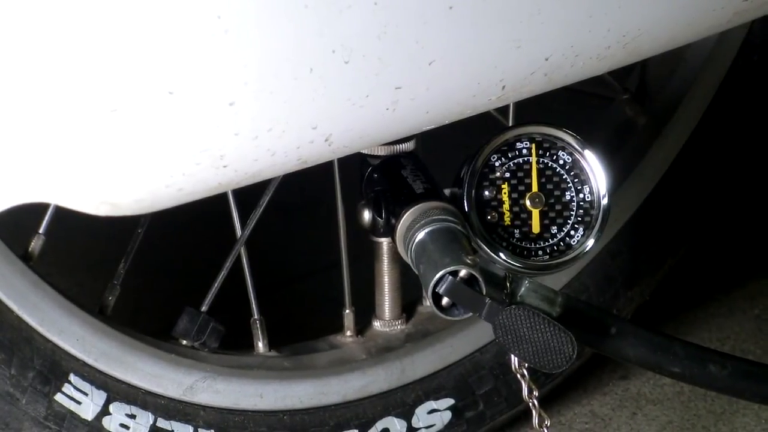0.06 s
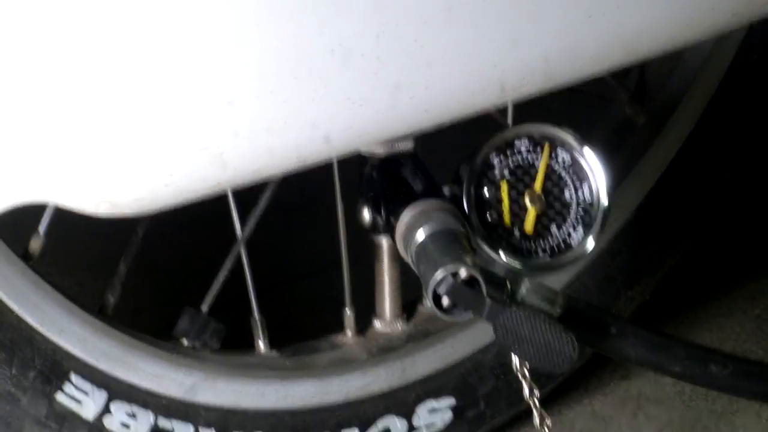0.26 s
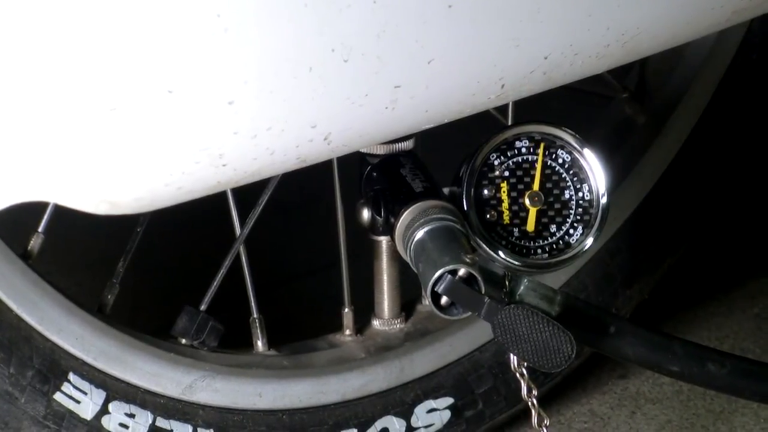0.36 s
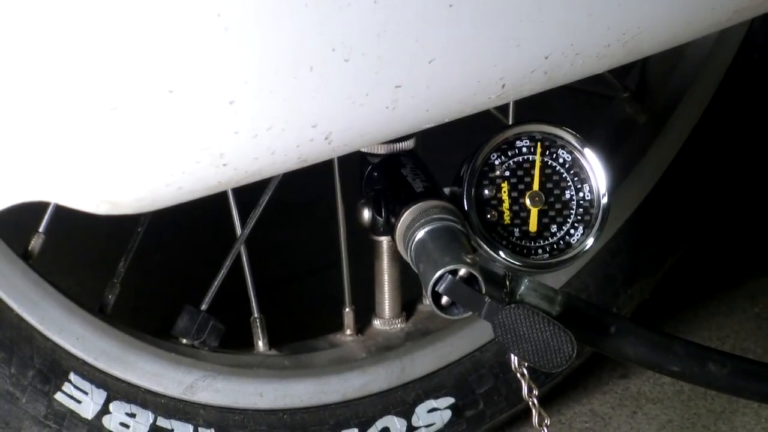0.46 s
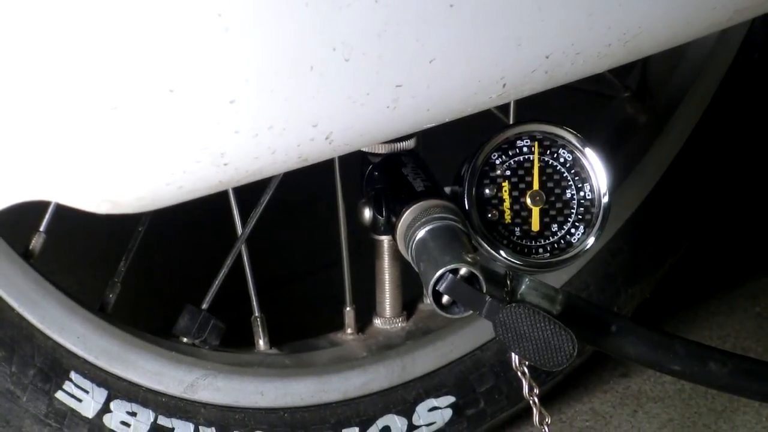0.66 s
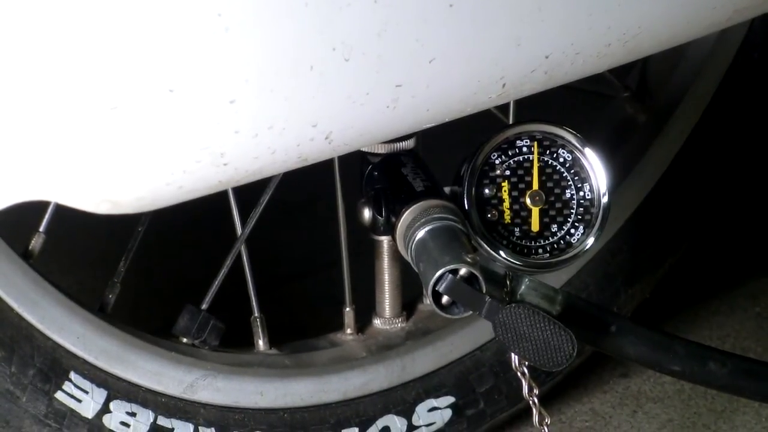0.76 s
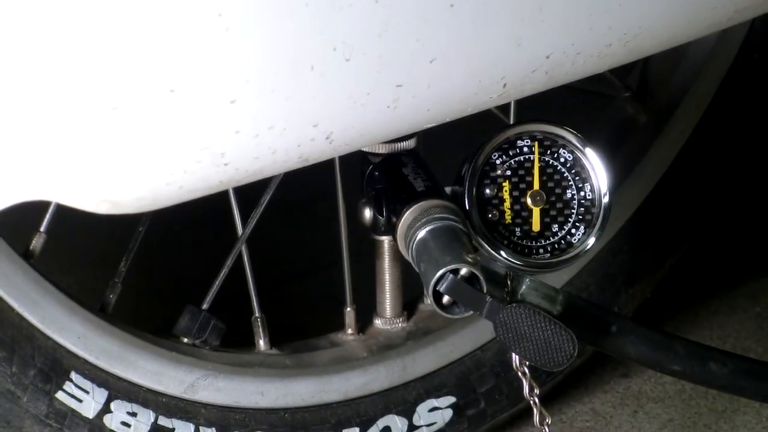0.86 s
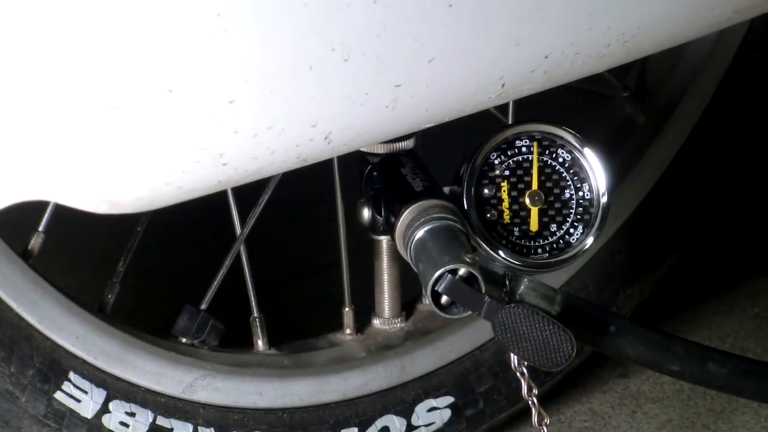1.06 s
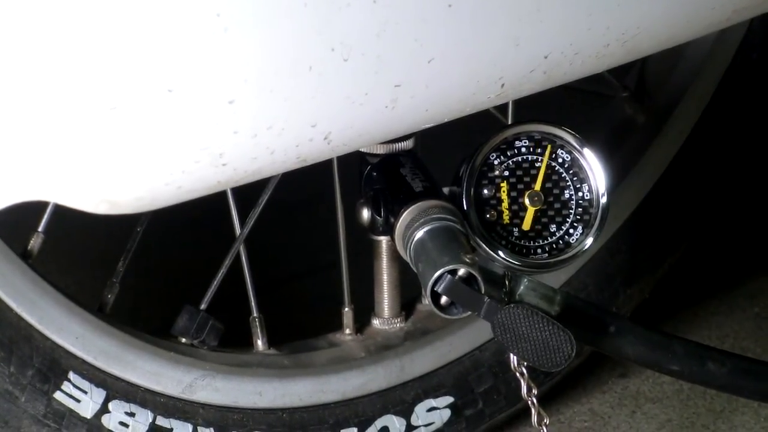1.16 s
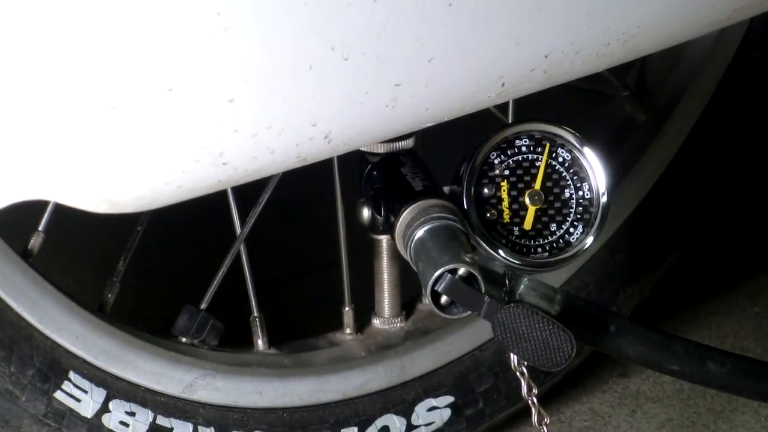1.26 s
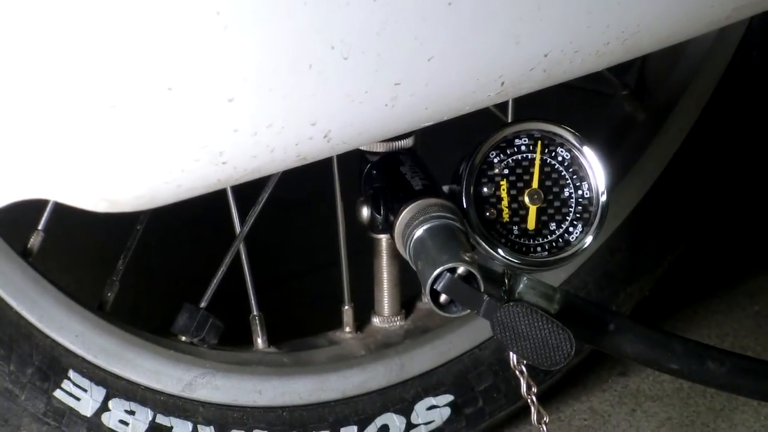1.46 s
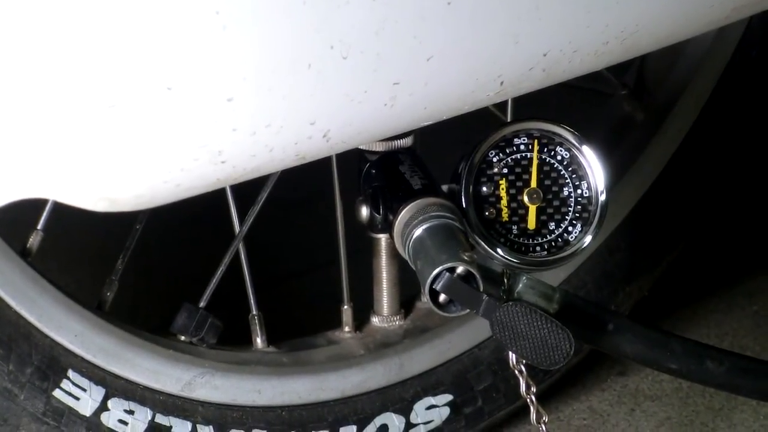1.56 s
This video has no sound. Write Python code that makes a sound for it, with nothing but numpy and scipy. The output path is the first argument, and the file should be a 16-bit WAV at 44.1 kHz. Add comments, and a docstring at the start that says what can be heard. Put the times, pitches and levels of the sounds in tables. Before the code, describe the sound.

A bicycle floor pump, heard close in a hard, echoing room with quiet room tone. Gritty, whistling air hisses from the start, with small ticks; at 0.24 s a loud piston thump booms and hums on, with a softer knock at 0.3. Thin valve whistles fade. Faint clicks and puffs come at 0.42 and 0.92. From 1.04 to 1.3, metal clicks, air and soft thumps crowd together; a sharp click snaps at 1.37.

```python
"""A floor pump fills a bicycle tyre in a hard, echoing room, heard close up over quiet room tone.
A burst of air is already hissing at the start: gritty noise plus whistling jet resonances.
Near 0.24 s the piston thumps at the end of its stroke: body modes ring, low room modes swell and hum,
and thin drifting whistles follow. More bursts come at 0.4 and 0.9 s; from 1.04 s metal clicks (noise
cracks and short modes), softer thumps and air crowd together, up to a sharp click near 1.37 s."""
import sys
import numpy as np
from scipy import signal
from scipy.fft import rfft, irfft
from scipy.io import wavfile
from scipy.ndimage import uniform_filter1d

SR = 44100
rng = np.random.default_rng(int(sys.argv[2]) if len(sys.argv) > 2 else 0)


def magnitude_from_level(level_db):
    """Linear magnitude for a level in decibels (20 dB per decade)."""
    exponent = np.asarray(level_db, float) / 20
    return 10 ** exponent


def pcm_store(signal):
    """Save signal as 16-bit PCM."""
    levels = np.round(np.clip(np.atleast_2d(signal), -1, 1) * 32767)
    wavfile.write(sys.argv[1], SR, levels.astype(np.int16).T)


N = 70560  # samples, 1.6 s

# spectrum of the room tone: pitch_hz, level_db (per Hz, relative)
ROOM_TONE = [(15, -26), (25, -6), (87, 2), (175, -9.5), (335, -8), (1260, -29.5), (1650, -25),
             (2480, -28.5), (7310, -29), (14400, -30.5), (16000, -47)]
ROOM_TONE_DB = -49
# decay of the room's tail: pitch_hz, t60_s
ROOM_DECAY = [(60, 0.56), (160, 0.75), (420, 0.76), (1100, 0.48), (2900, 0.55), (7700, 0.19), (14000, 0.14)]
ROOM_DB = -9
# stereo width of diffuse sound: pitch_hz, side_minus_mid_db
WIDTH = [(60, -11), (110, -11.5), (380, -16), (700, -10), (2380, -11), (4400, -8), (8120, 0), (15000, 0.5)]
# tilt of the direct sound between the two ports: pitch_hz, left_minus_right_db
PORT_TILT = [(60, -1), (380, -2), (2380, -1), (15000, 3.5)]
PORT_LAG_S = -0.000021
# low modes of the room, which build up after a knock: pitch_hz, level_db, t60_s
ROOM_MODES = [(47.3, -12, 0.86), (82.3, -11.5, 1.255), (121, -30, 0.77), (236.7, -27, 1.12),
              (294.9, -20, 0.78), (367.4, -36, 2.9), (494.5, -28, 1.25)]
HUM_RISE_S = 0.0276  # time constant of the build-up
# big knock shaking the microphone, opposite in its two ports: start_s, length_s, pitch_hz, level_db
MIC_SHAKE = (.2492, .1, 77, -25)
# metal clicks: start_s, level_db, strongest_near_hz, spread_octaves, ring_db (relative to level_db)
CLICK_EVENTS = [(.113, -41.5, 1750, 0.26, -7), (0.1194, -29, 6540, 0.13, -34),
                (0.2096, -27, 5150, 0.3, -45), (0.2417, -32.5, 2660, 0.95, -18.5),
                (0.4175, -34, 3300, 0.67, -17), (0.9192, -41, 5100, 1.2, -27),
                (1.044, -33, 3000, 1.12, -48), (1.0770, -29, 6660, 0.78, -40),
                (1.09, -23.5, 7340, 0.21, -40), (1.0916, -23, 3300, 0.97, -22),
                (1.1498, -22, 5000, 1.1, -33), (1.172, -33, 1740, 0.97, -37), (1.207, -32, 7950, 0.2, -36),
                (1.256, -36, 7760, 0.31, -33), (1.277, -39, 7800, 0.22, -41),
                (1.3653, -19.5, 3900, 1.84, -23.5)]
# short modes of the struck parts, before a small random detune: pitch_hz, level_db, t60_s
METAL_MODES = [(907, 12, 0.069), (1750, 0, 0.06), (2767, -4, 0.04), (3300, 1.5, 0.043), (4813, 8, 0.018),
               (5510, -5, 0.027), (7150, -0.5, 0.017), (8750, -3, 0.01), (11500, -2, 0.06)]
# long rings of barrel and spokes: pitch_hz, level_db, t60_s
LONG_RINGS = [(1523, -7, .7), (3040, -6, .5), (4606, -1, .33), (4636, -3, .3)]
CRACK_T60_S, CRACK_TOP_HZ = 0.014, 11500
DRY_SPREAD_OCTAVES = 0.55  # blows wider than this snap more than they ring
# piston and foot of the pump knocking:
# start_s, level_db, strongest_near_hz, spread_octaves, room_hum_db (relative to level_db), rise_s
THUMP_EVENTS = [(.2420, -12, 302, 2.12, 2, 0.00099), (.295, -15.5, 83, 1.47, -8.5, 0.0036),
                (1.152, -21, 123, 0.39, -28.5, 0.012), (1.151, -21.5, 419, 0.31, -10, 0.0069),
                (1.233, -19, 167.4, 0.38, -16.5, 0.0033), (1.258, -17.5, 91.5, 0.41, -19.5, 0.0061),
                (1.285, -25, 63, .4, -11.5, 0.011), (1.372, -28.5, 104, 1.25, -21, 0.008),
                (1.397, -35, 405, 0.44, -34, 0.002), (1.390, -22, 820, 0.18, -26, 0.0021)]
# modes of pump body and floor: pitch_hz, level_db, t60_s
BODY_MODES = [(62.5, -6.5, .12), (91, -7, 0.074), (127.7, -2.5, 0.092), (158, -10, 0.098),
              (220, -3.5, 0.053), (351.4, -1.5, 0.052), (391.6, -3, 0.048), (489, -11, 0.086),
              (640, -15.5, 0.074), (822, -12.5, 0.047), (1011, -18, 0.21), (1790, -4, 0.049)]
# thin whistles in the valve: start_s, length_s, first_hz, last_hz, level_db
VALVE_WHISTLES = [(.262, .085, 11700, 11650, -49), (.27, .2, 9400, 9000, -58), (.47, .3, 8950, 8400, -63),
                  (.52, .24, 10900, 11300, -65), (1.17, .23, 9700, 8950, -59)]
WHISTLE_WIDTH_HZ = 450
# resonances of the air jet: pitch_hz, width_hz, level_db (relative)
JET_RESONANCES = [(6070, 2100, -16), (7070, 550, -13.5), (8200, 1000, -15)]
# onset of each air burst: start_s
BURST_ONSETS = [-.05, .108, .208, .242, .417, .917, 1.07, 1.15, 1.366]
# shape of each burst: rise_s, hold_s, level_db, t60_s, jet_db, brightness_db (both relative to level_db)
BURST_SHAPES = [(0.012, 0.028, -44.5, 0.8, 11, -4), (0.0057, 0.033, -45.5, 0.38, 15, -0.5),
                (0.0019, 0.0085, -37.5, 0.34, -9, -1.5), (0.0045, 0.015, -38, 0.24, 5.5, -4),
                (0.002, 0.017, -44, 0.53, -16, -7), (0.0062, 0.015, -50, 1, 11.5, -5),
                (0.02, 0.019, -40, 0.48, 10.5, 0), (0.0049, 0.037, -49.5, 0.62, 14.5, 2.5),
                (0.0025, 0.021, -43.5, 0.46, -27, -2.5)]
# spectrum of the hiss: pitch_hz, level_db (per Hz, relative)
HISS_SPECTRUM = [(350, -8), (600, -2.5), (834, -2.5), (1510, -10), (2990, -6.5), (4710, -7.5),
                 (12000, -4.5), (16000, -13)]
GRIT_DB = 2.6  # rms of the fast level flutter
AIR_SPLIT_HZ = 5000  # between dull and bright hiss
AIR_WIDE_DB = -2


def read(points, hz):
    """Reads a table value on a log-frequency axis."""
    table_hz, value = np.transpose(points)
    return np.interp(np.log(hz + 1), np.log(table_hz + 1), value)


def evened(x):
    """Scales a sound to rms 1."""
    return x / np.sqrt(np.mean(x ** 2) + 1e-20)


def add(mix, start_s, sound):
    """Drops a sound into the mix at a given time."""
    part = mix[round(start_s * SR):][:len(sound)]
    part += sound[:len(part)]


def colour(x, points):
    """Filters a sound by a spectrum table."""
    n = x.shape[-1]
    gain = magnitude_from_level(read(points, np.fft.rfftfreq(n, 1 / SR)))
    return irfft(rfft(x) * gain, n)


def band_noise(hz, width_hz):
    """Noise through one resonance, at rms 1."""
    f = np.fft.rfftfreq(N, 1 / SR)
    resonance = 1 / (1 + (2 * (f - hz) / width_hz) ** 2)
    return evened(irfft(rfft(rng.standard_normal(N)) * resonance, N))


def modes(table, t, phase=0):
    """Sum of exponentially dying sines, as a struck object rings."""
    hz, db, t60 = np.transpose(table)[:, :, None]
    return (magnitude_from_level(db - 60 * t / t60) * np.sin(2 * np.pi * hz * t + phase)).sum(0)


def near(hz, centre_hz, spread):
    """Level change in dB away from where a blow is strongest."""
    return -12 * (np.log2(hz / centre_hz) / spread) ** 2


def struck(table, centre_hz, spread):
    """Weights modes by how strongly a blow excites each one."""
    return [(hz, db + near(hz, centre_hz, spread), t60) for hz, db, t60 in table]


def diffuse(mid, side):
    """Left and right from unrelated mid and side sound."""
    side = colour(side, WIDTH)
    return np.array([mid + side, mid - side])


def room_tone():
    """Steady quiet noise shaped by a spectrum and spread in stereo."""
    mid, side = colour(rng.standard_normal((2, N)), ROOM_TONE)
    return magnitude_from_level(ROOM_TONE_DB) * evened(diffuse(mid, side))


def room(x):
    """Dense echo tail: noise in which each band dies at its own speed."""
    hz, t, z = signal.stft(rng.standard_normal((2, SR)), SR, nperseg=512)
    decay = magnitude_from_level(-60 * t / read(ROOM_DECAY, hz)[:, None])
    tail = signal.istft(z * decay, SR, nperseg=512)[1]
    # silent for 3.3 ms, then fades in over 11 ms
    tail = tail * np.clip(np.arange(tail.shape[1]) / SR / 0.011 - 0.3, 0, 1)
    tail = tail / np.linalg.norm(tail[0])
    mid, side = signal.fftconvolve(x[None], tail, axes=1)[:, :N]
    return magnitude_from_level(ROOM_DB) * diffuse(mid, side)


def room_hum():
    """Each thump pushes the room's low modes, which swell slowly and hum on."""
    push, t = np.zeros(N), np.arange(SR) / SR
    for start_s, db, _, _, hum_db, _ in THUMP_EVENTS:
        add(push, start_s, [-magnitude_from_level(db + hum_db)])
    swell = 1 - np.exp(-t / HUM_RISE_S)
    return signal.fftconvolve(push, swell * modes(ROOM_MODES, t))[:N]


def shake():
    """A few low cycles, pushing one port while pulling the other."""
    start_s, length_s, hz, db = MIC_SHAKE
    u = np.clip((np.arange(N) / SR - start_s) / length_s, 0, 1)
    swing = np.sin(np.pi * u) ** 0.5 * np.sin(2 * np.pi * hz * length_s * u)
    return np.array([[1], [-1]]) * magnitude_from_level(db) * swing


def crack(centre_hz, spread, t):
    """The snap of a click: band-shaped noise that dies within milliseconds."""
    f = np.fft.rfftfreq(len(t), 1 / SR) + 1
    shape = magnitude_from_level(near(f, centre_hz, 2 * spread)) / (1 + (f / CRACK_TOP_HZ) ** 10)
    noise = evened(irfft(rfft(rng.standard_normal(len(t))) * shape, len(t)))
    return 0.5 * noise * magnitude_from_level(4 - 60 * t / CRACK_T60_S)


def clicks():
    """A crack of noise and the metal modes near its own pitch, with a faint long ring."""
    out, t = np.zeros(N), np.arange(SR // 2) / SR
    attack = np.minimum(t / 0.0011, 1)
    for start_s, db, centre_hz, spread, ring_db in CLICK_EVENTS:
        detune = 0.99 + 0.019 * rng.random(len(METAL_MODES))
        parts = [(hz * k, g, t60) for (hz, g, t60), k in zip(struck(METAL_MODES, centre_hz, spread), detune)]
        tick = modes(parts, t, 2 * np.pi * rng.random((len(parts), 1)))
        tick = min(DRY_SPREAD_OCTAVES / spread, 1) * tick / abs(tick).max()
        snap = (tick + crack(centre_hz, spread, t)) * attack
        ring_phase = 2 * np.pi * rng.random((len(LONG_RINGS), 1))
        ring = modes(struck(LONG_RINGS, centre_hz, spread), t, ring_phase)
        ring = magnitude_from_level(ring_db) * ring * np.minimum(t / 0.0035, 1)
        add(out, start_s, magnitude_from_level(db) * (snap + ring))
    return out


def thumps():
    """Soft pushes of piston and foot ring the pump body and floor at once."""
    out, t = np.zeros(N), np.arange(SR) / SR
    for start_s, db, centre_hz, spread, _, rise_s in THUMP_EVENTS:
        onset = np.sin(np.pi / 2 * np.minimum(t / rise_s, 1)) ** 2
        add(out, start_s, -magnitude_from_level(db) * modes(struck(BODY_MODES, centre_hz, spread), t) * onset)
    return out


def whistle(start_s, length_s, first_hz, last_hz, db):
    """Thin valve whistle: a narrow band of noise that drifts in pitch."""
    u = np.clip((np.arange(N) / SR - start_s) / length_s, 0, 1)
    carrier = np.exp(2j * np.pi * np.cumsum(first_hz + (last_hz - first_hz) * u) / SR)
    wander = band_noise(0, WHISTLE_WIDTH_HZ) + 1j * band_noise(0, WHISTLE_WIDTH_HZ)
    fade = np.minimum(u / 0.03, 1) * (1 - u ** 2)
    return magnitude_from_level(db) * fade * (wander * carrier).real


def jet_noise():
    """Noise through the whistling resonances of the air jet."""
    return 0.5 * sum(magnitude_from_level(db) * band_noise(hz, width_hz) for hz, width_hz, db in JET_RESONANCES)


def burst_envelopes():
    """Rise, hold and decay of dull hiss, bright hiss and jet; overlapping bursts add in power."""
    t = np.arange(N) / SR
    dull, bright, jet = np.zeros((3, N))
    for start_s, (rise_s, hold_s, db, t60, jet_db, bright_db) in zip(BURST_ONSETS, BURST_SHAPES):
        since = t - start_s
        fall_db = 60 * np.maximum(since - rise_s - hold_s, 0) / t60
        shape = np.clip(since / rise_s, 0, 1) * magnitude_from_level(db - fall_db)
        dull = np.hypot(dull, shape)
        bright = np.hypot(bright, magnitude_from_level(bright_db) * shape)
        jet = np.hypot(jet, magnitude_from_level(jet_db) * shape)
    return dull, bright, jet


def air():
    """Valve air as central and spread sound: gritty hiss in both, jet and whistles in the centre."""
    dull, bright, jet = burst_envelopes()
    grit = magnitude_from_level(GRIT_DB * evened(uniform_filter1d(rng.standard_normal(N), 120)))
    hiss = evened(colour(rng.standard_normal((2, N)), HISS_SPECTRUM))
    low = signal.filtfilt(*signal.butter(2, AIR_SPLIT_HZ, fs=SR), hiss)
    centre, spread = grit * (dull * low + bright * (hiss - low))
    centre = centre + grit * jet * jet_noise()
    centre = centre + sum(whistle(*row) for row in VALVE_WHISTLES)
    return centre, spread


def two_ports(direct):
    """Direct sound reaches two ports with a tiny lag and a tilt in level."""
    f = np.fft.rfftfreq(N, 1 / SR)
    left = np.exp(1j * np.pi * f * PORT_LAG_S) * magnitude_from_level(read(PORT_TILT, f) / 2)
    return irfft(rfft(direct) * np.array([left, 1 / left]), N)


def scene():
    """Pump sounds at two ports, with the room, its tone and part of the hiss diffuse around them."""
    centre, spread = air()
    direct = thumps() + clicks() + centre
    background = room_tone() + room(direct) + room_hum()
    wide_hiss = diffuse(np.zeros(N), magnitude_from_level(AIR_WIDE_DB) * spread)
    return background + shake() + two_ports(direct) + wide_hiss


def band_limit(x):
    """A steep low-pass at the top of the band."""
    return signal.sosfilt(signal.butter(12, 16430, fs=SR, output="sos"), x)


def record(dry):
    """Band limits of the microphone: a low cut at 40 Hz and a steep top cut at 15.9 kHz."""
    low_cut = signal.butter(4, 40, "highpass", fs=SR, output="sos")
    top_cut = signal.firwin(255, 15900, fs=SR)
    mix = signal.sosfilt(low_cut, dry)
    mix = signal.oaconvolve(mix, top_cut[None], "same")
    return band_limit(mix)


dry = scene()
out = record(dry)
pcm_store(out)
```